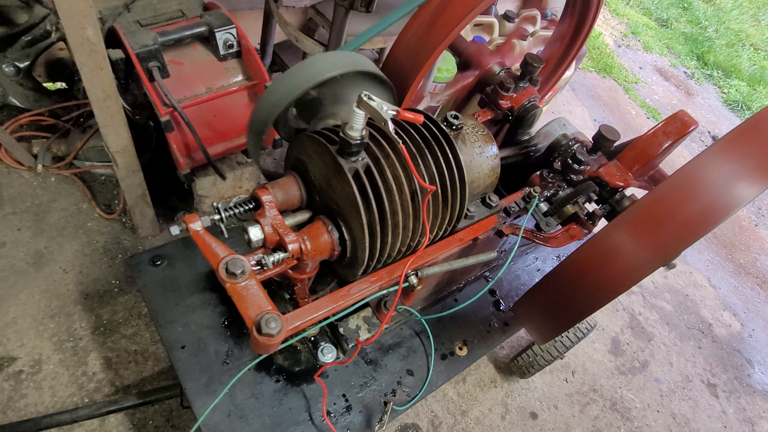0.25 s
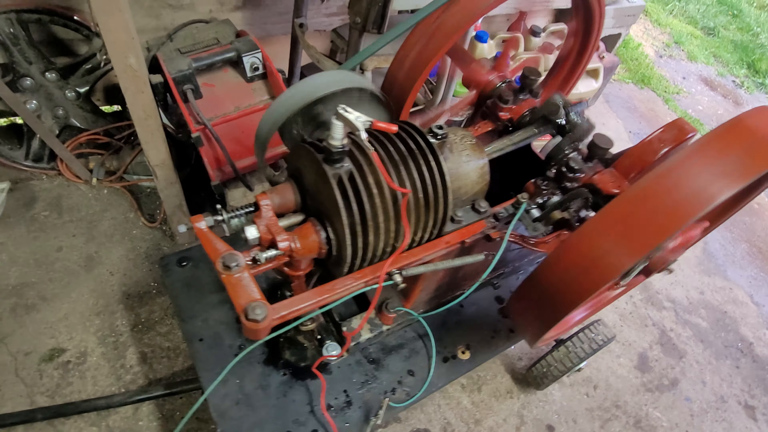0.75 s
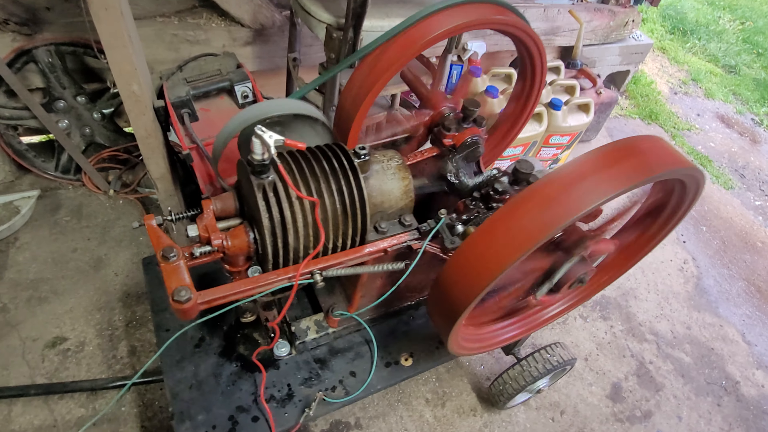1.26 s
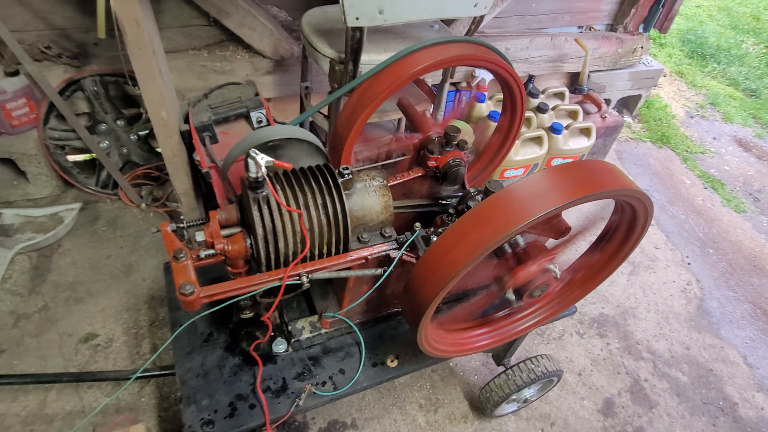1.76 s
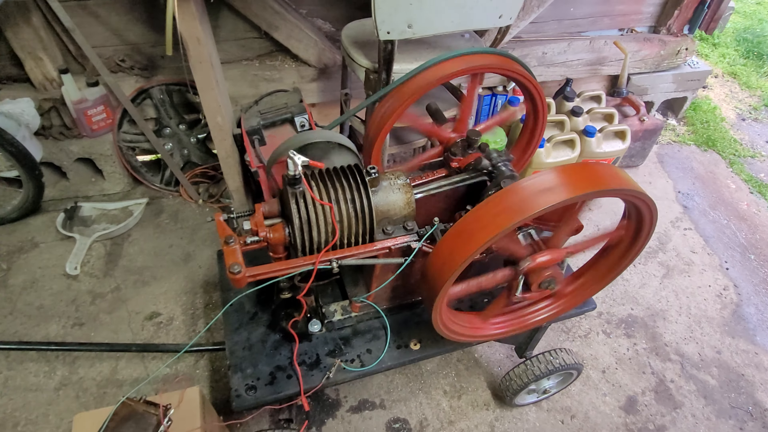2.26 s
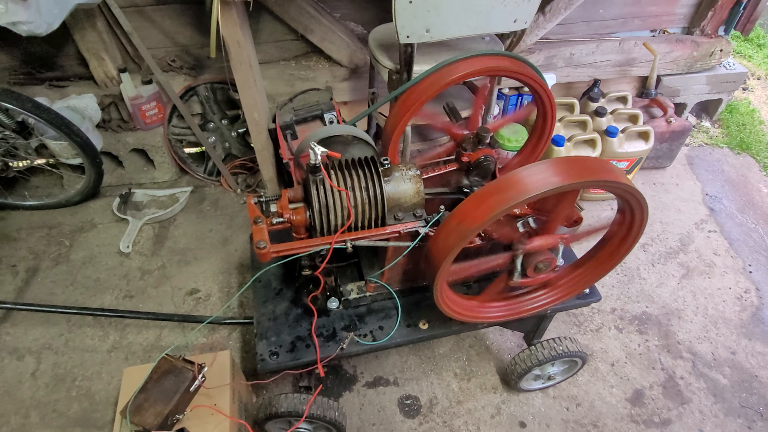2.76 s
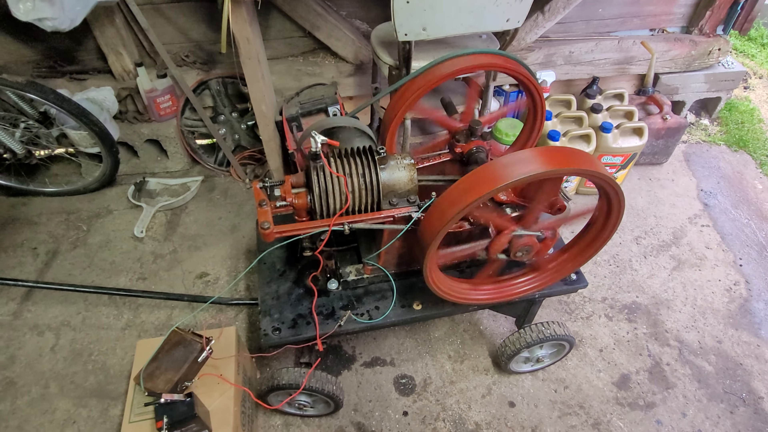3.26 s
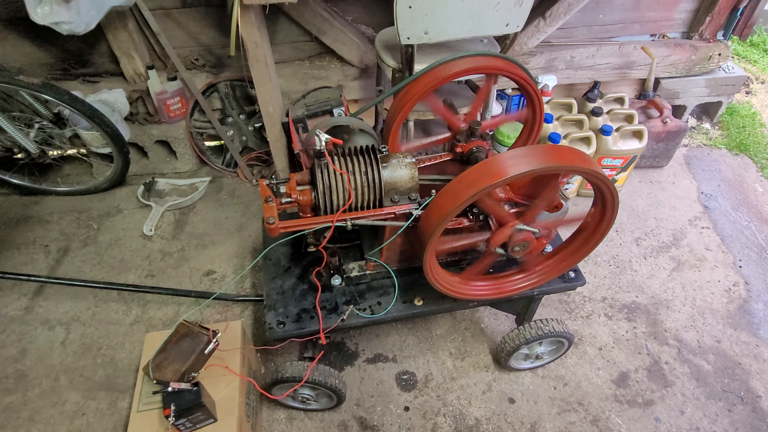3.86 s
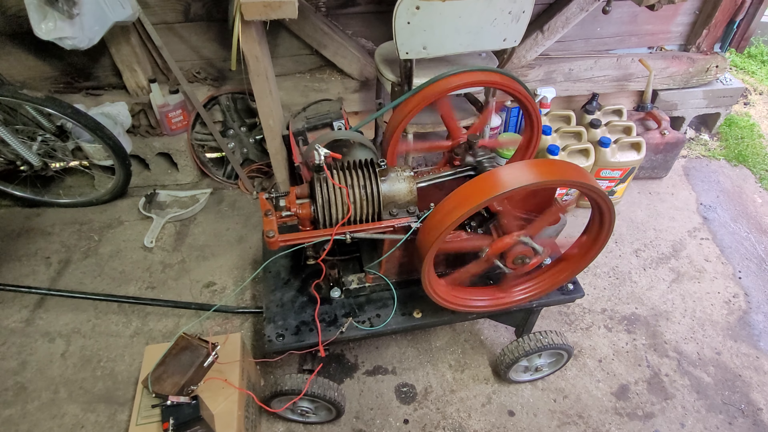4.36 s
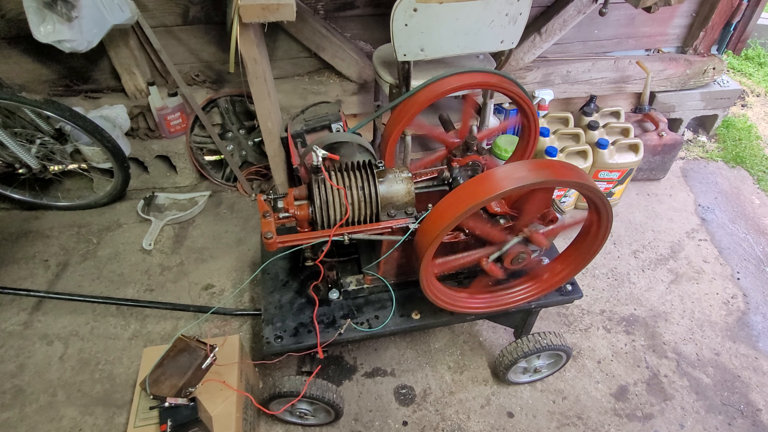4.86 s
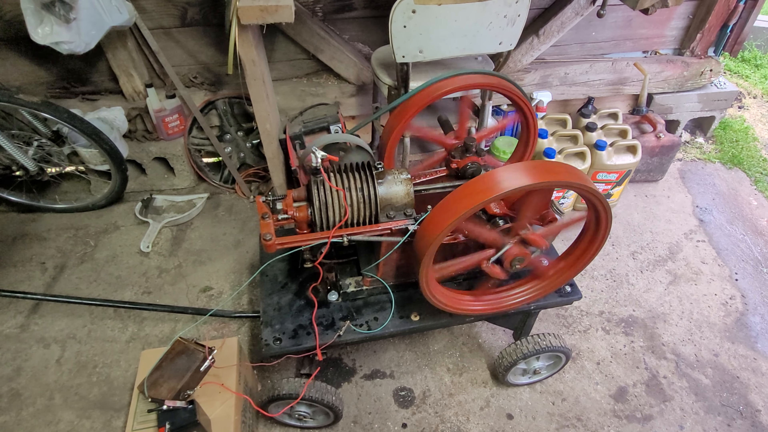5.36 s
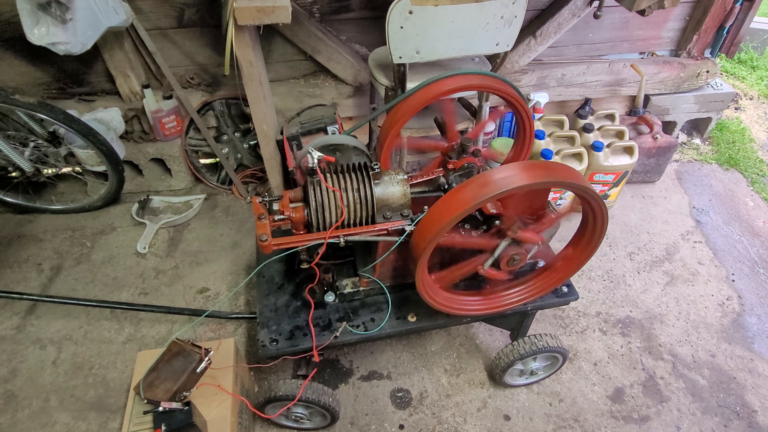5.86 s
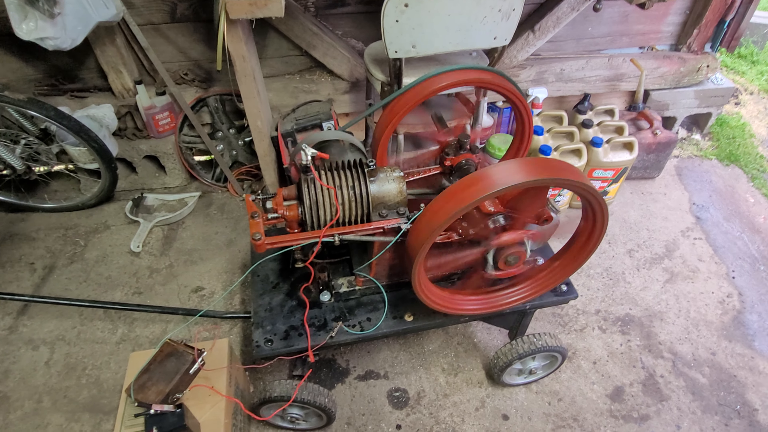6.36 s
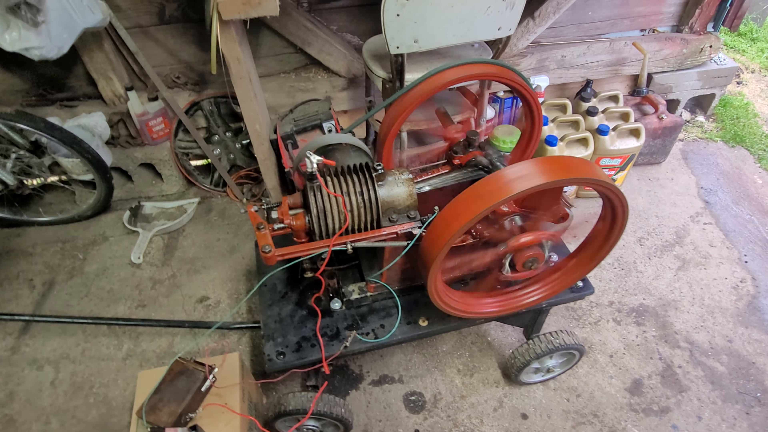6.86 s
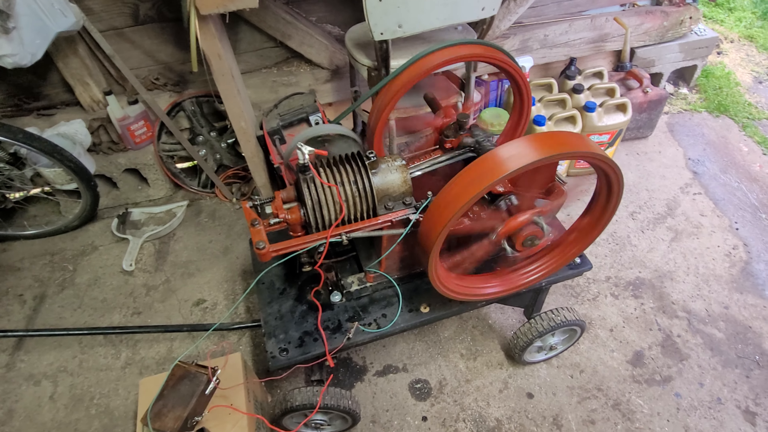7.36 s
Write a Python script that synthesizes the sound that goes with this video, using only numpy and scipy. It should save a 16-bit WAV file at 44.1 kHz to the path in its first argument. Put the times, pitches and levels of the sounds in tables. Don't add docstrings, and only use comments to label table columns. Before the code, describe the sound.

A small air-cooled engine runs unevenly in a cluttered shed. Cam, latch and pushrod tick and clack on ringing iron over two times a second, with breathy hisses and hollow pipe puffs between. Six times it gulps air and barks out burnt gas. Heard in stereo, first very near with crisp hiss to the left, then from a few steps back with a low boom, short dull echoes and faint rumble.

```python
import sys
import numpy as np
from scipy import signal
from scipy.fft import rfft, irfft
from scipy.io import wavfile
from scipy.ndimage import map_coordinates

SR = 44100
rng = np.random.default_rng(int(sys.argv[2]) if len(sys.argv) > 2 else 0)


def volts_from_db(level):
    exponent = np.asarray(level, float) / 20
    return 10 ** exponent


def put_to_file(sound):
    columns = np.atleast_2d(sound).T
    safe = np.clip(columns, -1, 1)
    whole_steps = np.round(safe * 32767)
    wavfile.write(sys.argv[1], SR, whole_steps.astype(np.int16))


N = 335160
HZ = np.fft.rfftfreq(N, 1 / SR) + 1

# (t/s, shed share/dB, hiss left-right/dB, contact brightness/dB,
# loudness of the surroundings/dB, nearness/0-1)
STEP_BACK = [
    (0, -9.5, 17.5, -19, -4.5, 1),
    (1.1, -8, 12.5, -10.5, -1, 1),
    (2.0, -7.5, 2.5, -17.5, 3.5, 0.46),
    (7.6, -5.5, 0, -18.5, 6.5, 0.65),
]
# (f/Hz, likeness/0-1)
LIKENESS = [(60, 0.77), (240, 1), (950, 0.9), (3770, -4.5), (15000, -0.12)]
# (f/Hz, left-right level/dB)
LEFTNESS = [(300, 0), (1300, -1), (2400, 1), (4400, 10), (6500, 4), (9000, 3)]

# (f/Hz, level/dB per Hz)
FLOOR = [(240, -37), (400, -5), (1280, -5), (2170, -10.5), (3370, -15), (5220, -6.5), (8000, -23),
         (10400, -94), (17600, -120)]
# (f/Hz, level/dB per Hz)
HUM = [(110, -19), (190, -23.5), (235, -11.5), (307, 4.5), (350, 0.5), (399, -22), (628, -27), (700, -18),
       (910, -45), (1540, -120)]
# (t/s, level/dB)
PIPE_HUM = [(0.0, -44), (0.57, -50), (1.2, -47.5), (1.6, -39.5), (2.71, -34.5), (3.89, -39), (4.04, -36),
            (7.37, -33.5), (7.6, -33.5)]
# (share of cycle/0-1, coasting level/dB, firing level/dB)
BREATH = [(0, -4, 5), (.12, 4, 1), (.28, 0.5, 0), (.36, -2, 1), (.58, -4.5, 9.5), (.65, 4.5, 8),
          (.82, 4.5, 3.5), (.9, 1, 1), (1, -3, -6.5)]

# (f/Hz, level/dB per Hz)
HISS_NEAR = [(2000, -17.5), (5000, -22.5), (7000, -7.5), (8500, -13.5), (10500, -1.5), (12500, 0.5),
             (15500, -10.5), (16500, -61)]
# (f/Hz, level/dB per Hz)
HISS_FAR = [(1500, -13), (2500, -4.5), (5000, 1), (7000, 4), (8300, -1.5), (10000, 9.5), (12500, -24),
            (15500, 8), (16500, -57)]
# (t/s, level/dB)
VALVE_HISS = [(0, -38), (0.9, -37), (1.4, -33), (1.9, -33.5), (2.3, -36.5), (3.5, -37.5), (5.3, -36),
              (7.6, -36.5)]
# (share of cycle/0-1, level/dB, length/s)
COASTING_STROKES = [(.385, 0, .068), (.893, -1, 0.054)]
# (share of cycle/0-1, level/dB, length/s)
FIRING_STROKES = [(.45, 4, 0.071), (.85, -2.5, 0.078)]
# (t/s, level over hiss/dB, share of the lower tone/0-1)
EDGE_TONE = [(0, -3, 0.08), (0.9, -3.5, .15), (1.3, -4, 1), (2.0, -5.5, .95), (3.0, -14, .95),
             (7.6, -14, .95)]

# (t/s, peak level/dB, sizzle/dB, flow time/s)
SNORTS = [(0.0024, -24, -14.5, 0.06), (1.1648, -37.5, -30, 0.064), (2.6745, -17.5, -14.5, 0.039),
          (4.199, -18.5, -17.5, 0.039), (5.7498, -18.5, -17.5, 0.05), (6.8904, -23, -30, 0.026)]
# (t/s, peak level/dB, sizzle/dB, flow time/s)
BLASTS = [(0.094, -24.5, -31, 0.037), (0.1074, -24.5, -15.5, 0.015), (1.2494, -14, -15, 0.033),
          (2.765, -14.5, -16.5, 0.033), (4.294, -12.5, -15, 0.03), (5.846, -14.5, -19, 0.037),
          (6.971, -13.5, -14.5, 0.037)]
# (t/s, peak level/dB, f/Hz)
PUFFS = [(0.022, -19.5, 420), (0.056, -17.5, 261), (0.509, -25.5, 449), (0.899, -27, 445),
         (1.249, -19, 486), (1.286, -21.5, 548), (1.637, -20, 298), (1.805, -24, 320), (2.568, -21, 310),
         (2.684, -12.5, 312), (2.752, -23, 325), (3.316, -17, 345), (4.092, -14, 350), (4.205, -16.5, 268),
         (4.23, -13, 313), (4.514, -17.5, 326), (4.667, -13.5, 332), (4.85, -14, 333), (5.428, -18.5, 303),
         (5.641, -17.5, 301), (5.683, -15, 343), (5.729, -17.5, 327), (5.765, -10.5, 281), (5.794, -9, 314),
         (5.836, -17, 316), (6.014, -16.5, 335), (6.222, -13.5, 336), (6.645, -20, 353), (6.91, -21, 329),
         (7.507, -16, 324.7)]
# (share of cycle/0-1, level over hum/dB, f/Hz)
UPPER_TONE = [(.72, 8, 450), (.79, 7.5, 450.5)]

# (share of cycle/0-1, level over hum/dB)
COASTING_ROCKS = [(.012, -8), (.17, -16), (.61, -8), (.775, -9.5), (.97, -16)]
# (share of cycle/0-1, level over hum/dB)
FIRING_ROCKS = [(.012, -7), (.18, -14), (.48, -13), (.69, -0.5), (.81, -4), (.97, -14)]
# (t/s, level/dB, rebound/dB, frame thud/dB)
CAM = [(0.224, -31.5, -42, -45), (0.597, -33.5, -45, -46), (0.994, -35, -48, -49),
       (1.367, -26.5, -35.5, -38), (1.721, -29, -38.5, -38), (2.099, -27, -43, -42),
       (2.504, -26.5, -33.5, -35), (2.882, -25.5, -40.5, -41), (3.24, -29, -40.5, -40),
       (3.617, -30.5, -44, -41), (4.031, -27, -38.5, -32), (4.414, -22.5, -38.5, -40),
       (4.773, -27, -44, -38), (5.16, -29, -45.5, -40), (5.579, -26, -37.5, -37),
       (5.966, -26.5, -38.5, -38), (6.332, -27, -43, -40.5), (6.725, -30, -43, -40),
       (7.09, -26, -38.5, -36), (7.436, -27, -42, -40)]
# (latch t/s, latch/dB, pushrod/dB, rocker t/s, rocker/dB)
RETURNS = [(0.425, -42, -36, 0.504, -40.5), (0.818, -45.5, -39.5, 0.886, -42.5),
           (1.557, -34, -33.5, 1.631, -33.5), (1.93, -38, -29.5, 2.003, -37.5),
           (2.3215, -42.5, -32, 2.406, -37), (3.074, -34.5, -36, 3.152, -38.5),
           (3.4505, -40.5, -34, 3.513, -38.5), (3.847, -40.5, -36, 3.928, -37.5),
           (4.607, -34, -33, 4.669, -35), (4.988, -38, -30.5, 5.054, -36), (5.39, -40, -31, 5.473, -34.5),
           (6.162, -36, -32.5, 6.241, -37.5), (6.548, -39, -37, 6.615, -34.5),
           (7.276, -33.5, -31.5, 7.3455, -36)]
# (t/s, level/dB)
GOVERNOR = [(0.964, -49.5), (2.471, -38), (3.999, -36.5), (5.128, -45), (5.54, -34), (7.404, -43.5)]
# (t/s, level/dB)
INTAKE_VALVE = [(1.162, -39), (2.6135, -32.5), (4.083, -35.5), (4.144, -32), (5.632, -31)]
# (t/s, level/dB)
IGNITER = [(1.2025, -40), (2.7195, -40), (4.249, -30), (5.784, -54), (6.93, -33)]
RING = {"cam": (0.07, -9, 0.1), "rebound": (3.6, 3.4, -1.5), "latch": (4.7, -5.5, 0.1),
        "pushrod": (-5.5, -4.5, -2.7), "rocker": (5.8, 2.7, 3), "slack": (9, 4.7, -1.5),
        "governor": (6.5, -1.5, -1.5), "intake": (0.1, -5, -1.5), "igniter": (1.5, -3.5, 0.1)}
# (t/s, peak level/dB)
TICKS = [(0.2274, -24), (0.267, -15), (0.4315, -24), (0.441, -24), (0.6, -22), (0.6164, -38), (0.635, -24),
         (0.8307, -24), (1.002, -27), (1.033, -23), (1.2284, -3), (1.3708, -32), (1.4092, -21),
         (4.273, -6.5), (6.9514, -9)]
# (f/Hz, level/dB per Hz)
METAL = [(240, -39), (400, 10.5), (554, 5.5), (841, 2), (1360, -2), (2010, -2), (2710, 0), (4510, 7),
         (8320, -1.5), (9000, 3), (11700, 0), (19800, -120)]
# (f/Hz, width/Hz, level/dB)
IRON = [(616, 54, -11), (1480, 25, -11.5), (1700, 55, -13), (1982, 84, -6.5), (2178, 68, -8),
        (2380, 58, -7), (3177, 27, -21), (4156, 125, -10.5), (4650, 173, -7.5), (4950, 69, -8.5),
        (5262, 113, -2), (5570, 46, -6.5)]


def rms_one(x):
    return x / np.sqrt(np.mean(x ** 2) + 1e-20)


def in_time(rows):
    s, *columns = np.transpose(rows)
    return [np.interp(np.arange(N) / SR, s, column) for column in columns]


def at_hz(points):
    hz, value = np.transpose(points)
    return np.interp(np.log(HZ), np.log(hz), value)


def flutter(rate, depth_db):
    knots = rng.standard_normal(8000)
    return volts_from_db(depth_db * map_coordinates(knots, [np.arange(N) / SR * rate], order=1))


def pair(length):
    mid, side = rfft(rng.standard_normal((2, length)), N)
    alike = np.clip(at_hz(LIKENESS), 0, 1)
    return np.sqrt(1 + alike) * mid + np.sqrt(1 - alike) * side * [[1], [-1]]


def air(spectrum):
    return rms_one(irfft(pair(N) * volts_from_db(at_hz(spectrum)), N))


def swell(s, rise_s, hold_s, t60):
    start = max(int(s * SR), 0)
    t = np.arange(min(int((hold_s + t60) * SR), N - start)) / SR
    decay = volts_from_db(-60 * np.maximum(t - hold_s, 0) / t60)
    return start, (1 - np.exp(-t / rise_s)) * decay


def cycles():
    strikes = np.array(CAM)[:, 0]
    cycle_s = 0.38
    edges = np.r_[strikes[0] - cycle_s, strikes, strikes[-1] + cycle_s]
    firing = np.searchsorted(edges, np.array(SNORTS)[:, 0]) - 1
    return edges, np.isin(np.arange(len(edges) - 1), firing)


def each_cycle(coasting, firing):
    rows = []
    edges, fires = cycles()
    for start, end, fired in zip(edges, edges[1:], fires):
        for share, *rest in (firing if fired else coasting):
            rows.append((start + share * (end - start), *rest))
    return rows


def over_hum(rows):
    return [(s, db + np.interp(s, *np.transpose(PIPE_HUM)), *rest) for s, db, *rest in rows if s > 0.05]


def background(around_db):
    rumble = volts_from_db(-72 + around_db) * air([(20, -17), (45, -3), (110, -6), (200, -17)])
    return rumble + volts_from_db(-52.5 + around_db) * air(FLOOR)


def pipe_hum():
    share, coasting, firing = np.transpose(BREATH)
    breath_db = in_time(each_cycle(list(zip(share, coasting)), list(zip(share, firing))))[0]
    return volts_from_db(in_time(PIPE_HUM)[0] + breath_db + 0.5) * flutter(32, 3.6) * air(HUM)


def valve_flow():
    t, flow = np.arange(N) / SR, np.zeros(N)
    for s, db, length_s in each_cycle(COASTING_STROKES, FIRING_STROKES):
        near = slice(max(int((s - 0.15) * SR), 0), int((s + 0.15) * SR))
        flow[near] += volts_from_db(db) * np.exp(-((t[near] - s) / (0.54 * length_s)) ** 2)
    return volts_from_db(-60) + flow * volts_from_db(in_time(VALVE_HISS)[0])


def edge_tone():
    level_db, lower = in_time(EDGE_TONE)
    lower = np.clip(lower, 0, 1)
    width = 1.12
    upper_air, lower_air = [air([(hz / width ** 2, -40), (hz / width, -11), (hz, 0),
                                 (hz * width, -11), (hz * width ** 2, -40)]) for hz in (12100, 10600)]
    return volts_from_db(level_db) * (np.sqrt(1 - lower) * upper_air + np.sqrt(lower) * lower_air)


def valve_hiss(sizzle, side_db, near):
    near = np.clip(near, 0, 1)
    jet = np.sqrt(near) * air(HISS_NEAR) + np.sqrt(1 - near) * air(HISS_FAR) + edge_tone()
    level = np.hypot(valve_flow(), sizzle) * volts_from_db(-1.5 + side_db * [[0.5], [-0.5]])
    return level * jet * flutter(300, 1.85)


def gas_rush():
    gas = np.zeros((4, N))
    # rows, upper ring/dB, lower knock/dB, fade to -60 dB/s
    for rows, upper_db, lower_db, t60 in ((SNORTS, 0.1, -0.93, 0.29), (BLASTS, 2.2, -6, 0.19)):
        for s, db, sizzle_db, flow_s in rows:
            i, shape = swell(s - 0.005, 0.0066, max(flow_s, 0), t60)
            levels_db = np.array([[db], [db + upper_db], [db + lower_db], [sizzle_db]])
            gas[:, i:i + len(shape)] += volts_from_db(levels_db - 8.5) * shape
    return gas


def puffs():
    out, t = np.zeros(N + SR), np.arange(SR // 12) / SR
    shape = (t / 0.012) ** 2 * np.exp(2 - 2 * t / 0.012)
    for s, db, hz in PUFFS + over_hum(each_cycle(UPPER_TONE, [])):
        i = int((s - 0.007) * SR)
        out[i:i + len(t)] += volts_from_db(db - 4) * shape * np.sin(2 * np.pi * (hz * t + rng.random()))
    return out[:N]


def thuds():
    out, t = np.zeros(N + SR), np.arange(-SR // 20, SR // 20) / SR
    shape = np.exp(-(t / 0.012) ** 2)
    cam_thuds = [(s + 0.036, db) for s, _, _, db in CAM]
    for s, db in cam_thuds + over_hum(each_cycle(COASTING_ROCKS, FIRING_ROCKS)):
        i = int(s * SR) - SR // 20
        hz, turn = 58 + 18 * rng.random(), rng.random()
        out[i:i + len(t)] += volts_from_db(db + 1) * shape * np.sin(2 * np.pi * (hz * t + turn))
    return out[:N]


def contacts():
    pushrod_s = [s for s, in each_cycle([(0.616,)], [])]
    return {"cam": [(s, db) for s, db, _, _ in CAM],
            "rebound": [(s + 0.031, db) for s, _, db, _ in CAM],
            "latch": [row[:2] for row in RETURNS],
            "pushrod": [(s, row[2]) for s, row in zip(pushrod_s, RETURNS)],
            "rocker": [row[3:] for row in RETURNS],
            "slack": each_cycle([(0.36, -49)], []),
            "governor": GOVERNOR, "intake": INTAKE_VALVE, "igniter": IGNITER}


def clacks():
    strength = np.zeros((4, N))
    for part, rows in contacts().items():
        upper_db, lower_db, sizzle_db = RING[part]
        colour_db = np.array([[0], [upper_db - 8], [lower_db], [sizzle_db + 2.5]])
        for s, db in rows:
            i, shape = swell(s - 0.0005, 0.003, 0.010, 0.1)
            strength[:, i:i + len(shape)] += volts_from_db(db + 2 + colour_db) * shape
    frame_lag = int(0.0027 * SR)
    strength[[0, 2]] = np.roll(strength[[0, 2]], frame_lag, axis=1)
    strength[3] *= volts_from_db(in_time(STEP_BACK)[2])
    return strength


def ticks():
    sizzle = np.zeros(N)
    for s, db in TICKS:
        i, shape = swell(s - 0.001, 0.0004, 0.002, 0.026)
        sizzle[i:i + len(shape)] += volts_from_db(db - 12.5) * shape
    return sizzle


def blows():
    gas, clack = gas_rush(), clacks()
    sizzle = clack[3] + ticks()
    sizzle += volts_from_db(-3) * signal.lfilter([0.0012], [1, -0.9988], sizzle)
    return clack[:3] + gas[:3], sizzle + gas[3]


def metal(strength):
    common, own = rfft(rng.standard_normal((2, N)) * flutter(600, 3.16))
    apart = 0.81 / (1 + (700 / HZ) ** 2)
    chatter = (common + apart * own * [[1], [-1]]) * volts_from_db(at_hz(METAL))
    over_low, over_high = [1 / (1 + (hz / HZ) ** 8) for hz in (1200, 3200)]
    bands = np.array([[over_low - over_high], [over_high], [1 - over_low]])
    parts = irfft(chatter * bands, N)
    struck = sum(gain * rms_one(part) for gain, part in zip(strength, parts)) + 1e-9
    body = volts_from_db(-4.5) * struck
    for hz, width_hz, db in IRON:
        r = np.exp(-np.pi * width_hz / SR)
        drive = volts_from_db(db) * flutter(14, 6.5) * struck
        ring = [1, -2 * r * np.cos(2 * np.pi * hz / SR), r * r]
        body += signal.lfilter([1 - r * r, 0, r * r - 1], ring, drive)
    return body


def boards(lower_knock, around_db):
    wood = air([(40, -13), (90, 1), (170, 5.5), (260, 16), (420, -30)])
    return volts_from_db(-5.5 - 0.6 * around_db) * lower_knock * wood


def ports(x):
    half = volts_from_db(at_hz(LEFTNESS) / 2)
    late = np.exp(-2j * np.pi * HZ * 0.00013)
    return irfft(rfft(x) * np.array([half, late / half]), N)


def shed(x):
    tail = irfft(pair(SR // 2), N)[:, :SR // 2]
    t = np.arange(SR // 2) / SR
    fade = volts_from_db(-60 * t / 0.26) * (1 - np.exp(-t / 0.0022))
    tail = signal.lfilter([0.5], [1, -0.4], tail * fade)
    tail /= np.sqrt(np.sum(tail ** 2) / 2)
    return signal.fftconvolve(x, tail, axes=1)[:, :N] * volts_from_db([[1.5], [-1.5]])


def scene():
    wet_db, side_db, _, around_db, near = in_time(STEP_BACK)
    strength, sizzle = blows()
    iron = metal(strength)
    low = puffs() + thuds()
    engine = ports(iron) + low + pipe_hum() + valve_hiss(sizzle, side_db, near)
    echo = shed(volts_from_db(wet_db) * iron + volts_from_db(-10) * low)
    return engine + echo + boards(strength[2], around_db) + background(around_db)


def roll_off(x):
    return signal.sosfilt(signal.butter(12, 16800, fs=SR, output="sos"), x)


def record(dry):
    bass_cut = signal.butter(2, 38, "high", fs=SR, output="sos")
    treble_cut = signal.cheby2(12, 45, 16200, fs=SR, output="sos")
    rounded = np.tanh(signal.sosfilt(bass_cut, dry) / 0.99)
    mix = 1.262 * signal.sosfilt(treble_cut, rounded)
    return roll_off(mix)


dry = scene()
out = record(dry)
put_to_file(out)
```